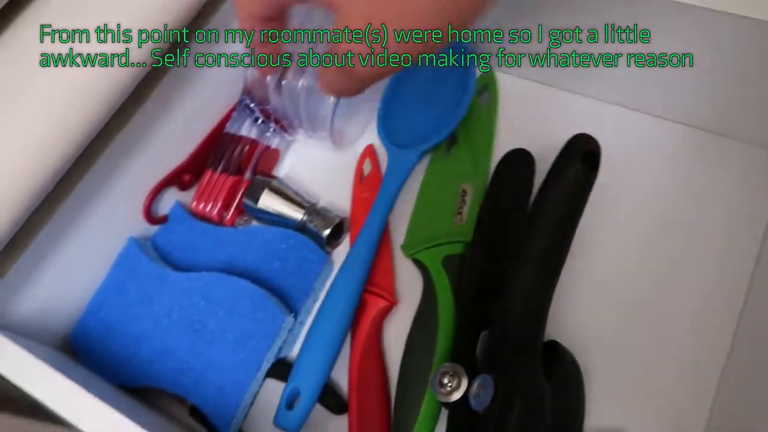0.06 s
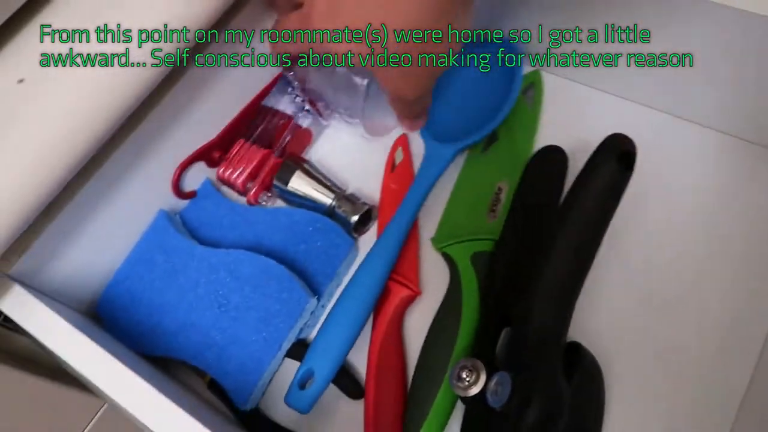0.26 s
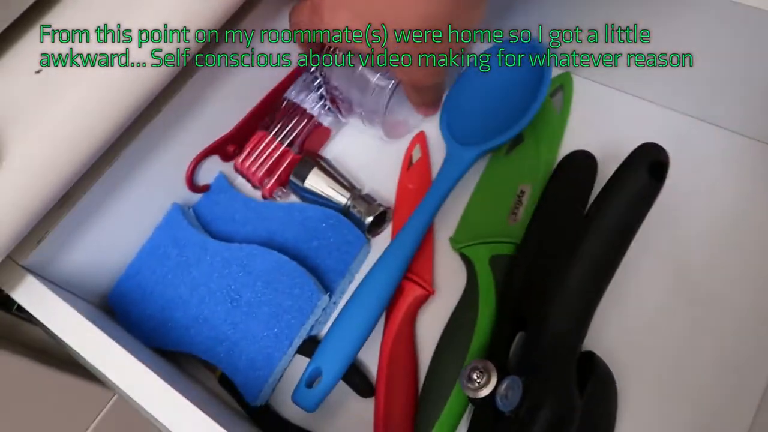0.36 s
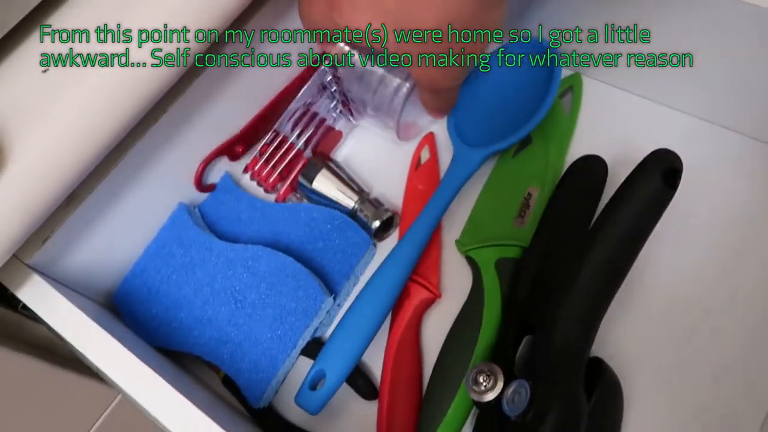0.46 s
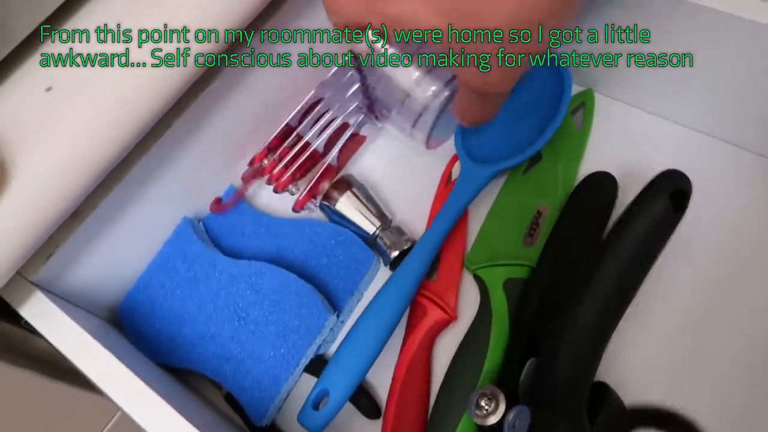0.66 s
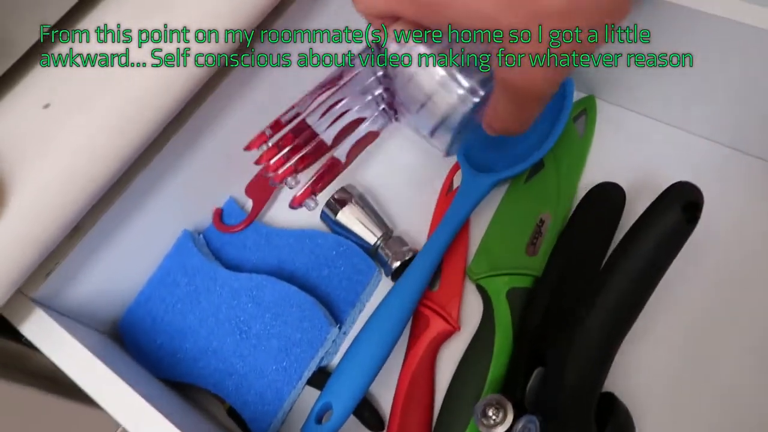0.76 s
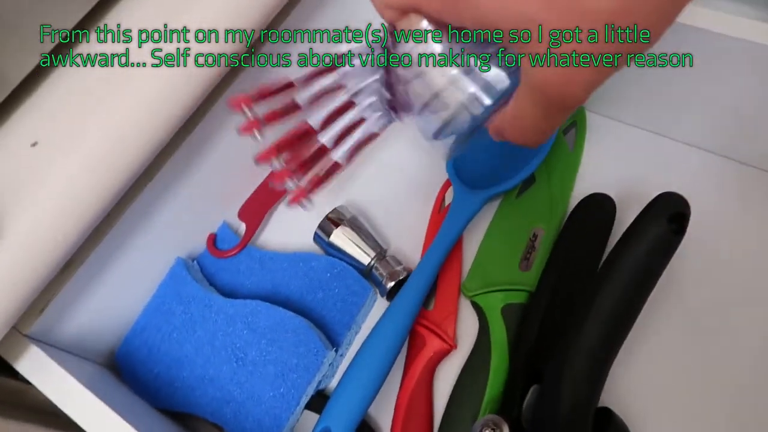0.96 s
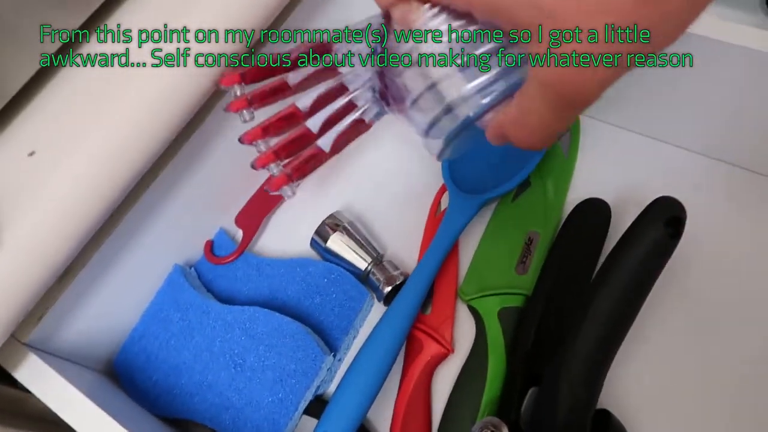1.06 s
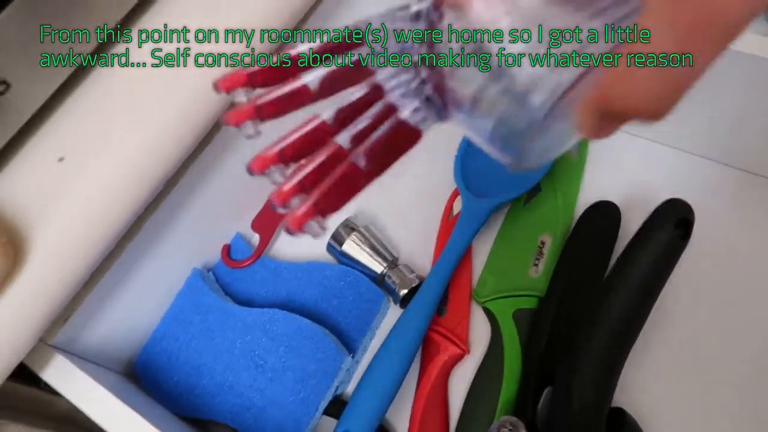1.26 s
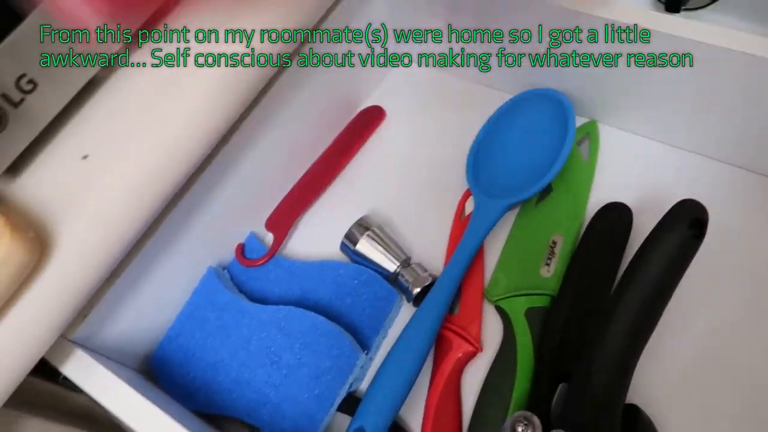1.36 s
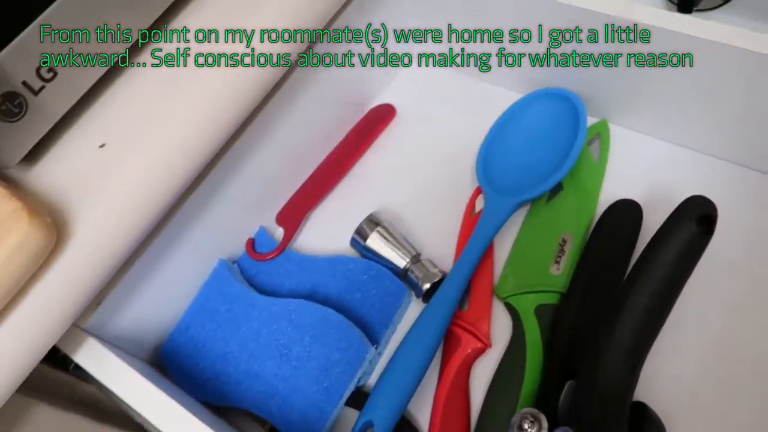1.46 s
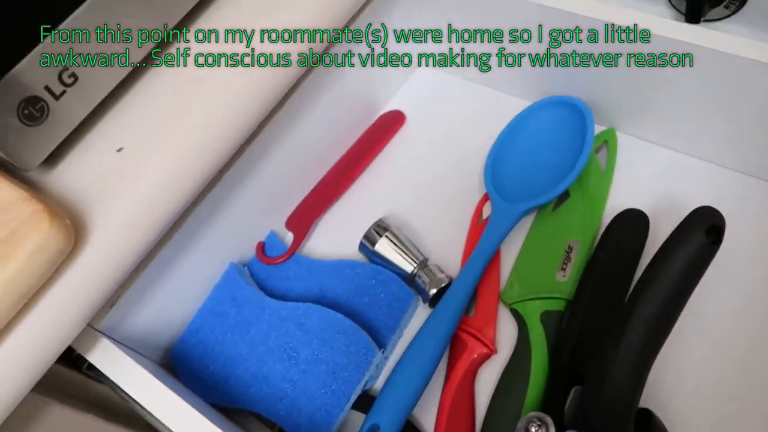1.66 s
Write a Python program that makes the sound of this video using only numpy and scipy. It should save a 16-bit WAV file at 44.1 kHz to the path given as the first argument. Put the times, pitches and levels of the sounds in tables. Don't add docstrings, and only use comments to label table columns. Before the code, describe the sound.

Hard plastic utensil clatter in a drawer, with dull board knocks, then a piece drops and bounces

```python
import sys
import numpy as np
from scipy import signal
from scipy.io import wavfile
from scipy.ndimage import uniform_filter1d

SR = 44100
rng = np.random.default_rng(int(sys.argv[2]) if len(sys.argv) > 2 else 0)


def dump_mix(stems):
    frames = np.atleast_2d(stems).T
    limited = np.clip(frames, -1, 1)
    pcm = np.round(limited * 32767).astype(np.int16)
    wavfile.write(sys.argv[1], SR, pcm)


def elevation(decibels):
    levels = np.asarray(decibels, float)
    return 10 ** (levels / 20)


N = 74970

# (frequency [Hz], level [dB], t60 [s])
BOARD = [(410, -6, 0.13), (523.4, -7, 0.058), (727.4, -3.5, 0.072), (795, 2.5, 0.036), (880, -11, .09),
         (1060, 3, 0.031), (1130, -6.5, 0.072), (1646, -4.5, 0.032)]
# (frequency [Hz], phase [rad])
SPREAD = [(200, 0.057), (1000, 0.14), (3000, 0.33), (6000, 0.79), (10000, 1.4), (15000, 2.2)]


def evened(x):
    return x / np.sqrt(np.mean(x ** 2) + 1e-20)


def read(points, hz):
    f, value = np.transpose(points)
    return np.interp(np.log(hz + 1), np.log(f + 1), value)


def add(mix, s, sound):
    part = mix[:, round(s * SR):][:, :sound.shape[1]]
    part += sound[:, :part.shape[1]]


def ring(modes, phase=0, gap=1):
    hz, db, t60 = np.transpose(modes)[:, :, None]
    t = np.arange(9000) / SR
    onset = np.minimum(t * 4000, 1)
    envelope = elevation(db - 60 * t / np.maximum(t60, .005)) * onset
    half_gap = read(SPREAD, hz) * gap / 2
    angle = 2 * np.pi * hz * t + phase
    return np.array([(envelope * np.sin(angle + side * half_gap)).sum(0) for side in (1, -1)])


def struck(x, kick):
    return signal.fftconvolve(x, kick[None], axes=1)


def without_bass(x, hz=233):
    return signal.sosfilt(signal.butter(3, hz, "high", fs=SR, output="sos"), x)


def background():
    # (frequency [Hz], level [dB])
    hiss = [(25, -19.5), (70, -21), (237, -6.5), (543, -10), (749, -20.5), (1210, -17), (3000, -31),
            (10500, -48.5), (12500, -81)]
    # (frequency [Hz], level [dB])
    hum = [(58, -53.5), (110, -53), (237, -46), (13000, -83)]
    # (time [s], hiss level [dB], hum level [dB])
    gain = [
        (0, -41.5, -40.5),
        (.2, -39.5, -37.5),
        (.8, -51, -57.5),
        (1.2, -52.5, -54),
        (1.7, -49.5, -47),
    ]
    frames, hz = N // 256 + 5, np.fft.rfftfreq(1024, 1 / SR)
    a, b, c, d, flutter = rng.standard_normal((frames, 513, 5)).T
    flutter = uniform_filter1d(flutter, size=10, axis=0)
    flutter = evened(uniform_filter1d(flutter, size=10, axis=1))
    coherence = np.cos(np.clip(2.4 * read(SPREAD, hz) + 8 / (hz + 20), 0, 1.5))[:, None]
    left = a + 1j * b
    right = coherence * left + np.sqrt(1 - coherence ** 2) * (c + 1j * d)
    z = np.array([left, right]) * elevation(read(hiss, hz)[:, None] + 0.5 * flutter)
    t = np.arange(N) / SR
    out = evened(signal.istft(z, nperseg=1024, noverlap=768)[1][:, :N])
    s, hiss_db, hum_db = np.transpose(gain)
    out = out * elevation(np.interp(t, s, hiss_db))
    hum_gain_db = np.interp(t, s, hum_db)
    for f, db in hum:
        waver = uniform_filter1d(rng.standard_normal(N), size=1500)
        waver = evened(uniform_filter1d(waver, size=1500))
        tone = np.sin(2 * np.pi * f * t + .5 * waver)
        out += elevation(db + 45.5 + 2.7 * waver + hum_gain_db) * tone
    return out


def crack(db, tilt_db, t60, ring_hz):
    # (frequency [Hz], level [dB])
    colour = [(290, -39), (500, -9), (1310, -4), (2430, -9), (2720, -5.5), (3960, -11), (6360, -15),
              (12500, -23), (15500, -36)]
    ring_db, ring_width_hz, ring_fade_s = 14.5, 256, 0.034
    snap_db, snap_t60 = 0.5, 0.012
    tail_db, tail_t60 = -12.5, 0.27
    damping, rise_s = 0.58, 0.0013
    chatter_s, chatter_db = .004, -9.5
    u = rng.random((2, 6))
    hz = np.fft.rfftfreq(128, 1 / SR)[:, None]
    t = np.arange(280) * 32 / SR
    a, b, c, e = rng.standard_normal((280, 65, 4)).T
    spectrum_db = read(colour, hz) + tilt_db * np.log2((hz + 200) / 3000) + 2.23 * e[:, :1]
    spectrum_db = spectrum_db + ring_db * np.exp(-((hz - ring_hz) / ring_width_hz) ** 2 - t / ring_fade_s)
    turn = np.exp(.5j * read(SPREAD, hz) * (1 + 0.8 * c))
    slow = ((hz + 200) / 2000) ** -damping
    body = elevation(-60 * t / (t60 * slow))
    snap = elevation(snap_db - 60 * t / snap_t60)
    tail = elevation(tail_db - 60 * t / (tail_t60 * slow))
    z = (a + 1j * b) * elevation(spectrum_db) * (body + snap + tail)
    x = signal.istft(np.array([z * turn, z / turn]), nperseg=128, noverlap=96)[1]
    x = x * np.minimum(np.arange(x.shape[1]) / SR / rise_s, 1)
    kick = np.zeros(1500)
    rebounds = (u[0] * chatter_s * 3 * SR).astype(int) % 1500
    kick[rebounds] = elevation(chatter_db - 10 * u[1])
    kick[0] = 1
    x = without_bass(struck(x, kick), 650)
    return elevation(db) * x / abs(x).max()


def clatter():
    # (time [s], peak level [dB], loudest ring [Hz], tilt [dB/octave], t60 [s])
    ticks = [(0.223, -38.5, 2360, 1, 0.093), (0.2662, -26, 1830, 1, .067), (0.2747, -9.5, 1900, 3, 0.015),
             (0.278, -5.5, 4900, -1.5, .05), (0.2797, -5.5, 3700, -2, 0.031),
             (0.286, -11, 1800, -2.5, 0.061), (.296, -23, 1250, 3, 0.053), (0.316, -16, 5000, -1, .06),
             (0.3259, -16.5, 1150, -10, .05), (0.3575, -13.5, 2800, -3, 0.048),
             (0.377, -21.5, 3200, 2, 0.044), (.3955, -7.5, 2500, -3, 0.03),
             (0.4054, -6.5, 3100, -4.5, 0.05), (0.4725, -18.5, 2916, -3, .05),
             (0.4952, -12.5, 1800, -4.5, .035), (0.4996, -6, 2810, -1, 0.037),
             (0.5341, -15, 1650, -0.5, .04), (0.5626, -14, 5500, -2, 0.065), (0.5646, -17, 2300, -2, 0.033),
             (0.6297, -21, 2700, -2, 0.1), (0.7283, -18, 2530, 2.5, 0.073), (0.745, -15, 5830, 0.5, 0.12),
             (0.7703, -9.5, 1930, -2.5, 0.088), (.812, -30, 1600, 3, 0.072), (0.868, -34, 3350, 4.5, 0.058),
             (0.942, -18, 1170, 4.5, 0.074), (1.036, -17, 2350, 0, .05), (1.049, -11.5, 900, 0, 0.11),
             (1.091, -14.5, 4100, 4, 0.086), (1.099, -18, 2630, 0, .06), (1.2359, -26, 1100, -1, 0.12),
             (1.2488, -19.5, 1260, 1.5, 0.078), (1.2505, -26, 2400, -1, .08), (1.3102, -25.5, 1050, 2, .05),
             (1.3342, -23.5, 1600, 0, 0.075), (1.481, -48.5, 2800, -2, .03), (1.554, -40.5, 800, -5, .04),
             (1.5998, -32, 2700, -11, .04), (1.608, -31, 1000, -22.5, .05)]
    out = np.zeros((2, N))
    for s, db, hz, tilt_db, t60 in ticks:
        add(out, s, crack(db, tilt_db, t60, hz))
    return out


def knocks():
    # (time [s], peak level [dB], pitch [Hz], t60 [s], upper mode level [dB])
    blows = [(0.224, -6.5, 316.5, 0.14, -23.5), (.275, -13, 410, 0.026, -2), (.286, -10.5, 439, .05, -14),
             (.296, -11, 445, 0.066, -10), (0.323, -12.5, 863, 0.036, -8.5), (0.356, -6, 327, 0.032, -15),
             (0.372, -9, 302, 0.064, -40), (0.38, -17.5, 305, .03, -2.5), (.3952, -2.5, 880, 0.04, -11),
             (.405, -5, 880, 0.18, -8), (0.477, -16.5, 312, 0.052, -12.5), (0.5335, 4, 540, 0.025, -15),
             (.539, -18.5, 410, .08, -9), (.548, -10, 535, 0.06, -4), (.565, -15, 636, .05, -5),
             (.579, -15.5, 420, .06, -8), (0.6496, -25, 334, 0.05, -8), (.653, -18, 340, 0.051, -3.5),
             (0.683, -16.5, 410, 0.09, -17), (0.701, -18.5, 420, .06, -12.5),
             (.714, -20.5, 503, 0.067, -18), (.729, -16, 440, .05, -9), (.716, -16, 318.4, 0.18, -16.5),
             (0.742, -14, 370, 0.06, -18), (0.751, -9, 315, .08, -20), (0.7575, -5.5, 370, 0.04, -10),
             (0.7705, 0, 403, 0.03, -7), (.773, -12, 1075, 0.044, -2), (.782, -8.5, 558, 0.04, -8),
             (.790, -17, 636, .04, -3.5), (.800, -22, 750, .04, -4.5), (.815, -24, 400, 0.036, -8),
             (.835, -36, 520, 0.032, -6), (1.107, -29.5, 164, .15, -23), (1.608, -31.5, 718, 0.05, -12.5)]
    contact_s = 0.0011
    out, push = np.zeros((2, N)), np.hanning(int(contact_s * SR) + 3)
    push = push / push.sum()
    for s, db, hz, t60, upper_db in blows:
        scatter = rng.standard_normal((len(BOARD), 3)) * [8, 4, 0]
        upper = np.array(BOARD) + [0, upper_db, 0] + scatter
        modes = np.vstack([[hz, 0, np.clip(t60, .02, .12)], upper])
        add(out, s, elevation(db) * struck(ring(modes), push))
    return without_bass(out)


def random_impulses(rate):
    sizes = elevation(2.9 * np.minimum(rng.exponential(1, N), 3))
    return (rng.random(N) < rate / 4 / SR) * sizes * rng.choice([-1, 1], N)


def drag():
    # (time [s], board rumble level [dB], handle rattle level [dB])
    slides = [
        (.23, -38.5, -50),
        (0.362, -23.5, -30.5),
        (0.461, -36, -51),
        (0.561, -21, -43),
        (0.632, -34, -63),
        (0.752, -30.5, -32),
        (.82, -43, -57.5),
        (0.942, -52, -49.5),
    ]
    slips_per_s, rattles_per_s = 240, 570
    upper_db = -3.5
    shake_db, shake_hz = -17, (46.5, 150)
    brush_s, brush_db, brush_length_s = 1.63, -52, .035
    s, low_db, high_db = np.transpose(slides)
    t, out = np.arange(N) / SR, np.zeros((2, N))
    slips, rattles = np.zeros((2, 2, N))
    for _ in range(4):
        board = np.vstack([[322, 4, .07], [430, 0, .06], np.array(BOARD[1:]) + [0, upper_db, 0]])
        board = board + rng.standard_normal((len(BOARD) + 1, 3)) * [10, 3, 0]
        slips += struck(ring(board), random_impulses(slips_per_s))[:, :N]
        rattles += struck(crack(0, -2.3, 0.086, 2500), random_impulses(rattles_per_s))[:, :N]
    for x, db in ((slips, low_db), (rattles, high_db)):
        out += evened(x) * elevation(np.interp(t, s, db, -90, -90))
    stroke = np.exp(-((t - brush_s) / brush_length_s) ** 2)
    brush = elevation(brush_db) * stroke * evened(np.gradient(rattles, axis=1))
    noise = rng.standard_normal(N) + 0.22 * rng.standard_normal((2, N))
    shake = signal.sosfilt(signal.butter(2, shake_hz, "band", fs=SR, output="sos"), noise)
    shake = evened(shake) * elevation(shake_db + np.interp(t, s, low_db, -90, -90))
    return shake + without_bass(out + brush)


def drawer_jolts():
    # (time [s], level [dB])
    jolts = [
        (.285, -36),
        (.532, -33),
    ]
    out = np.zeros((2, N))
    u = np.arange(4000) / SR / .008
    for s, db in jolts:
        add(out, s, elevation(db) * np.ones((2, 1)) * u * (2 - u) * np.exp(1 - u))
    return out


def steel_tine():
    # (frequency [Hz], level [dB], t60 [s])
    tine = [4660, -46, .08]
    out, t = np.zeros((2, N)), np.arange(6000) / SR
    contacts = rng.standard_normal(6000) * (rng.random(6000) < .05) * elevation(-60 * t / .11)
    add(out, .566, struck(ring([tine]), contacts))
    return out


def peeler():
    # (time [s], peak level [dB], crack tilt [dB/octave], crack t60 [s], ring level [dB])
    landings = [
        (0.945, -2.5, 2.5, 0.04, -19.5),
        (1.0347, -12, 5, 0.12, -16),
    ]
    # (frequency [Hz], level [dB], t60 [s])
    drop_modes = [(740, -15.5, 0.091), (875, -14, 0.071), (1058, -1.5, 0.083), (1170, -2, 0.048),
                  (1302, 1.5, 0.048), (1750, -4, 0.056), (2100, -1.5, 0.1), (2673, -0.5, 0.018),
                  (3130, -6, 0.063), (3420, -9, 0.034), (4100, -4, .05), (5960, -15, 0.019)]
    # (frequency [Hz], level [dB], t60 [s])
    bounce_modes = [(738, -11.5, 0.052), (888.2, -2, 0.13), (1033, -4, 0.077), (1476, -12.5, 0.054),
                    (2090, -5.5, 0.075), (2340, 0.5, 0.045), (2543, -7, 0.078), (3380, -7, 0.024),
                    (4054, -6, 0.035), (5540, -3, 0.028)]
    rocking_t60, rocking_db = 0.14, -12
    out, t = np.zeros((2, N)), np.arange(6000) / SR
    for (s, db, tilt_db, t60, ring_db), modes in zip(landings, (drop_modes, bounce_modes)):
        rocking = rng.standard_normal(6000) * (rng.random(6000) < .03)
        rocking = rocking * elevation(rocking_db - 60 * t / rocking_t60)
        add(out, s, crack(db, tilt_db, t60, 3920))
        phase = 2 * np.pi * rng.random((len(modes), 1))
        add(out, s, elevation(ring_db) * struck(ring(modes, phase), rocking + (t == 0)))
    return out


def room(x):
    # (frequency [Hz], t60 [s])
    reverb = [(200, 0.25), (1000, 0.38), (4000, 0.37), (12000, 0.41)]
    taps = np.zeros((2, 20000))
    at = np.arange(100, 19980, 20) + rng.integers(0, 20, (1, 994)) + rng.integers(0, 3, (2, 994))
    signs = rng.choice([-1., 1.], (1, 994)) * np.ones((2, 1))
    np.put_along_axis(taps, at, signs, 1)
    hz, t, z = signal.stft(taps, SR, nperseg=256)
    tail = signal.istft(z * elevation(-60 * t / read(reverb, hz)[:, None]), SR, nperseg=256)[1]
    return signal.fftconvolve(x, tail / np.linalg.norm(tail[0]), axes=1)[:, :N]


def treble_gate(x):
    # (frequency [Hz], level [dB])
    threshold = [(7000, -38), (10000, -22), (12500, -12), (15500, -3)]
    spread_db, recover_db_per_s = 5, 70
    hz, t, z = signal.stft(x, SR, nperseg=2048, noverlap=1024)
    band = np.minimum(np.arange(len(hz)) // 16, 63)
    power = (abs(z[:, :1024]) ** 2).reshape(2, 64, 16, -1).mean((0, 2))
    level_db = 10 * np.log10(power + 1e-16)
    recovery_db = recover_db_per_s * t
    held_db = np.maximum.accumulate(level_db + recovery_db, axis=1) - recovery_db
    chance_db = spread_db * rng.standard_normal((len(t), 64)).T * (held_db > level_db + 3)
    keep = (level_db - held_db + chance_db)[band] > read(threshold, hz)[:, None]
    keep = keep | (hz < threshold[0][0])[:, None]
    return signal.istft(z * keep, SR, nperseg=2048, noverlap=1024)[1][:, :N]


def scene():
    near = clatter() + knocks() + drag() + drawer_jolts() + steel_tine() + peeler()
    return background() + near + elevation(-12.5) * room(near)


def roll_off(x):
    return signal.sosfilt(signal.butter(12, 15800, fs=SR, output="sos"), x)


def record(dry):
    lowpass = signal.firwin(255, 15700, fs=SR)[None]
    x = signal.oaconvolve(np.clip(dry, -1, 1), lowpass, "same")
    mix = np.clip(treble_gate(x), -1, 1)
    return roll_off(mix)


dry = scene()
out = record(dry)
dump_mix(out)
```